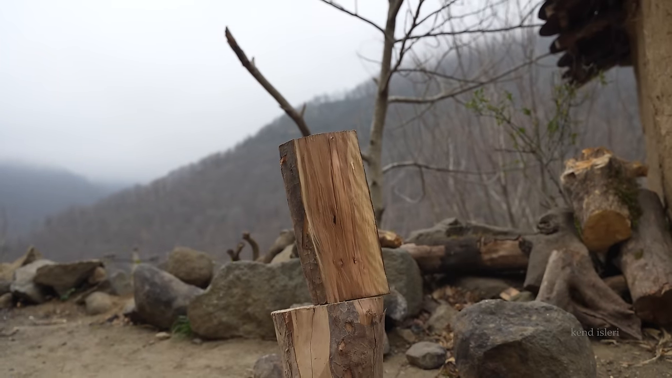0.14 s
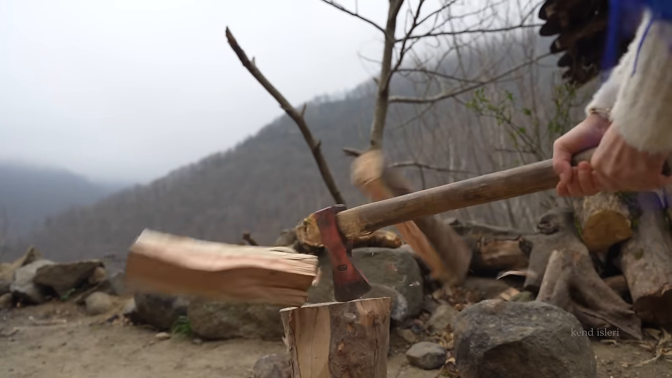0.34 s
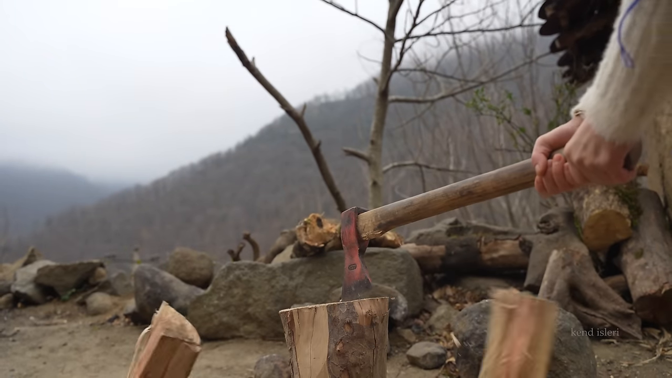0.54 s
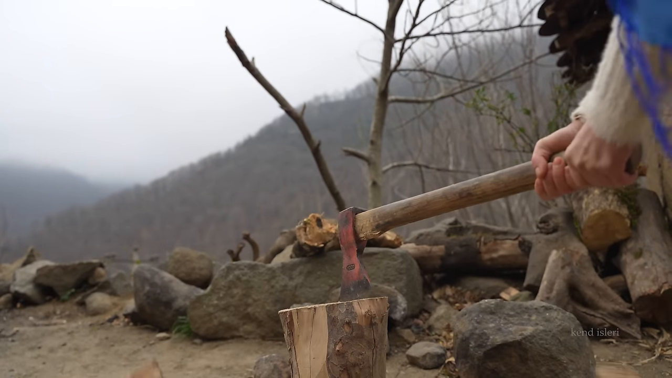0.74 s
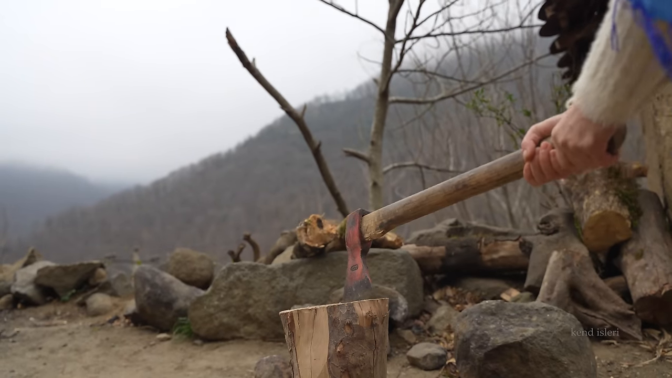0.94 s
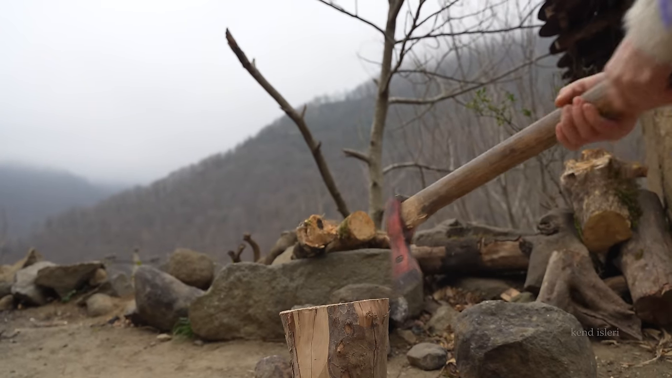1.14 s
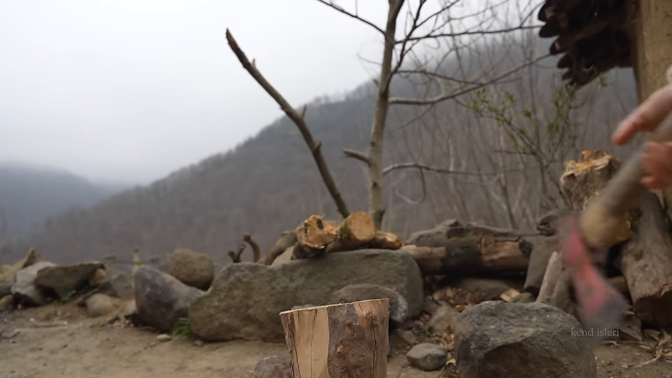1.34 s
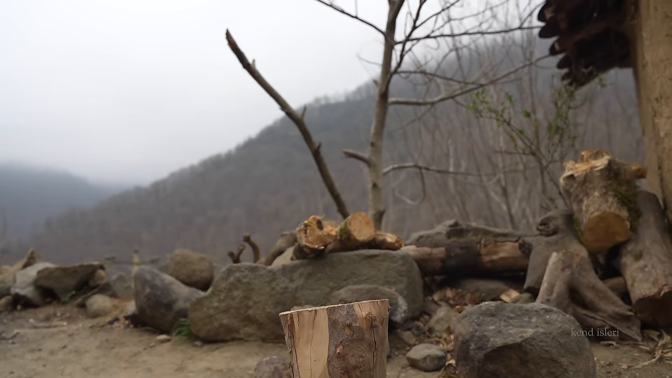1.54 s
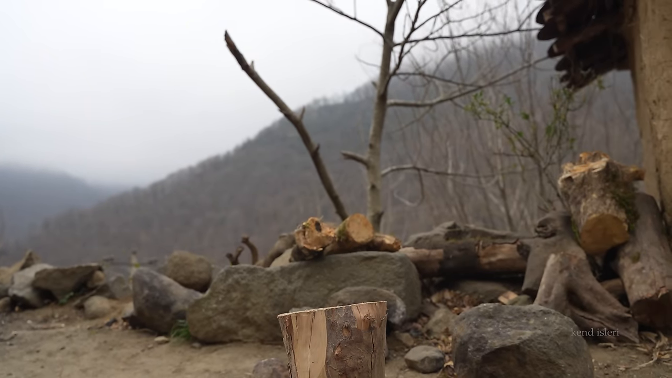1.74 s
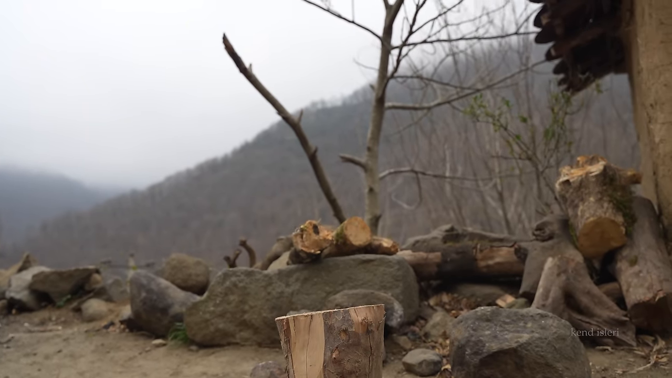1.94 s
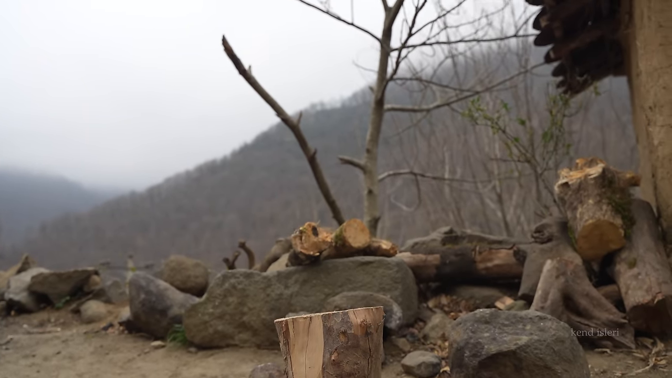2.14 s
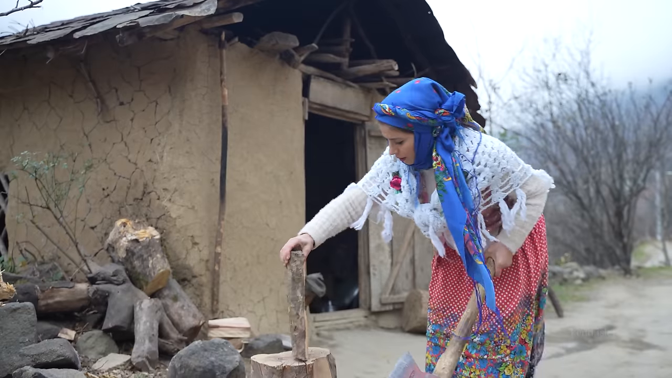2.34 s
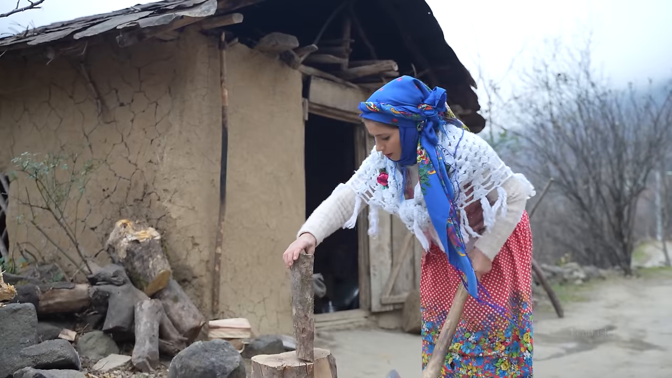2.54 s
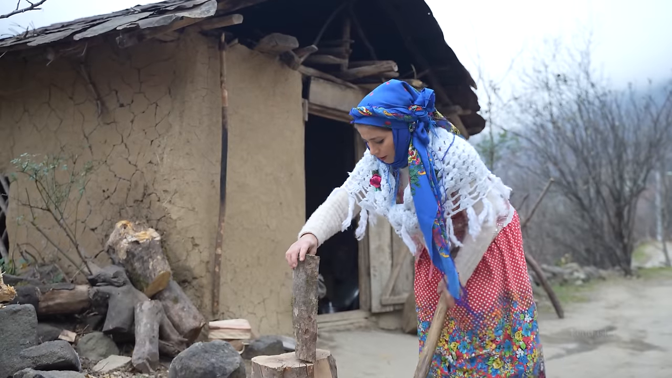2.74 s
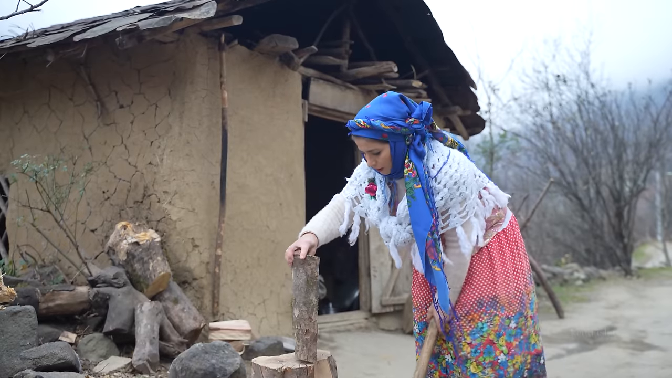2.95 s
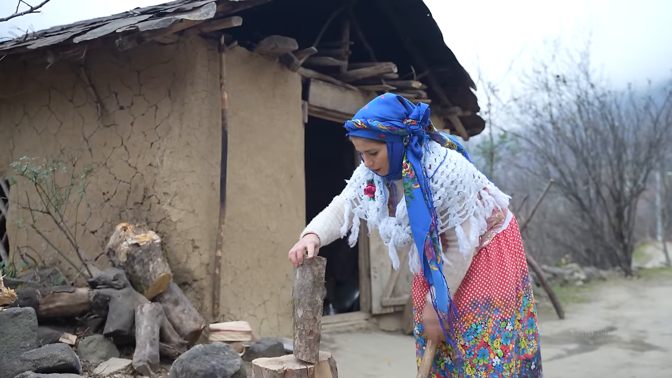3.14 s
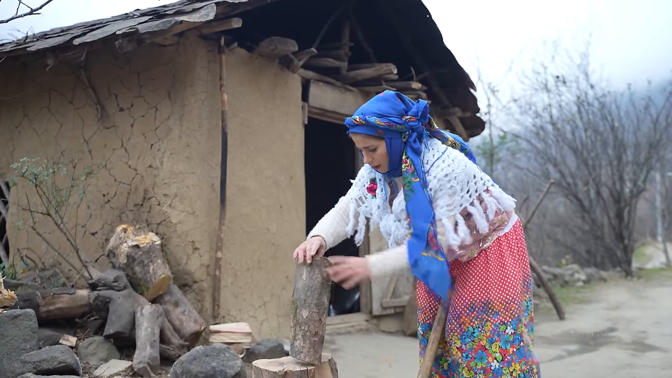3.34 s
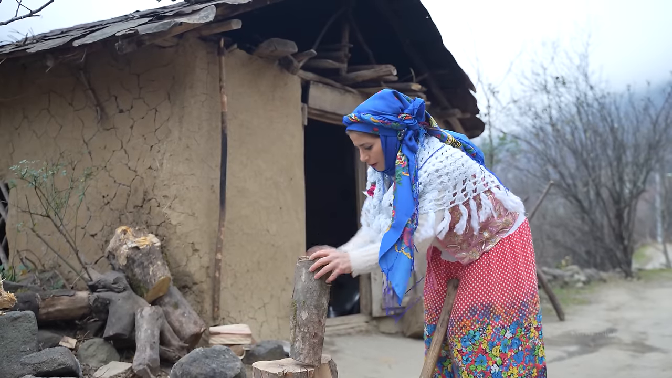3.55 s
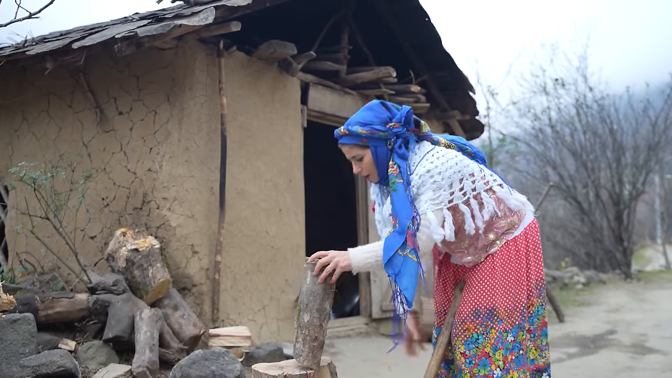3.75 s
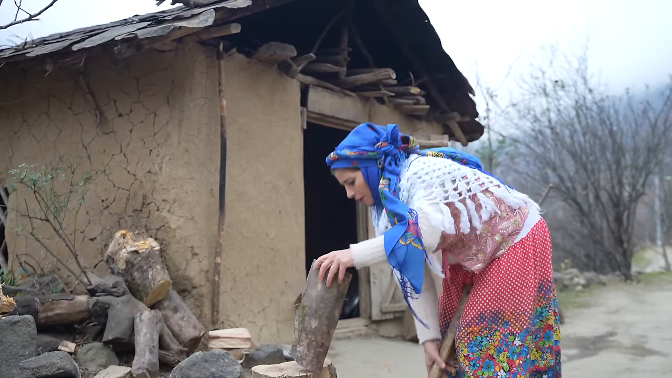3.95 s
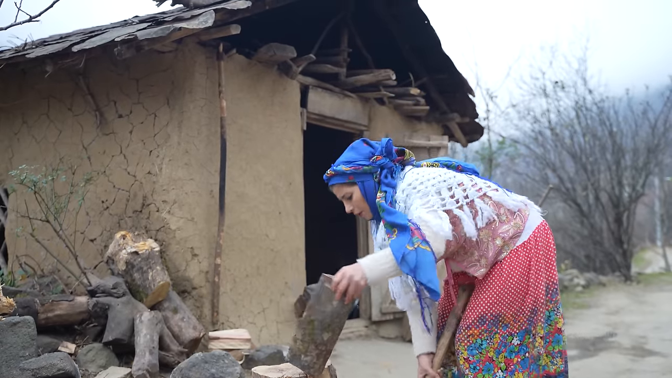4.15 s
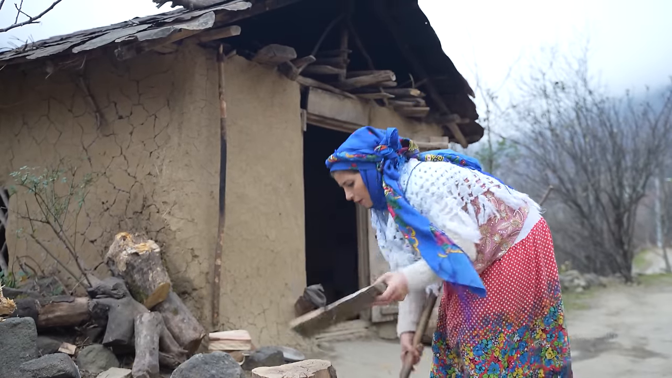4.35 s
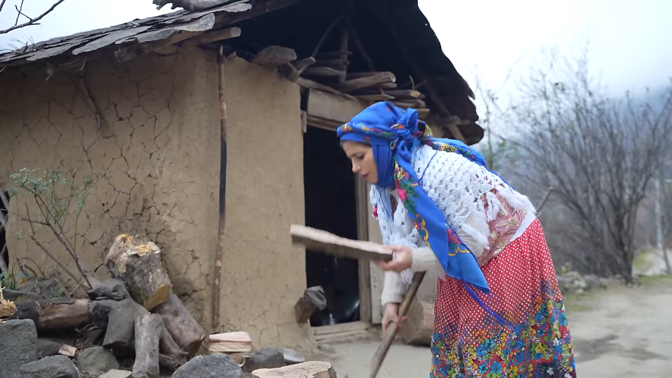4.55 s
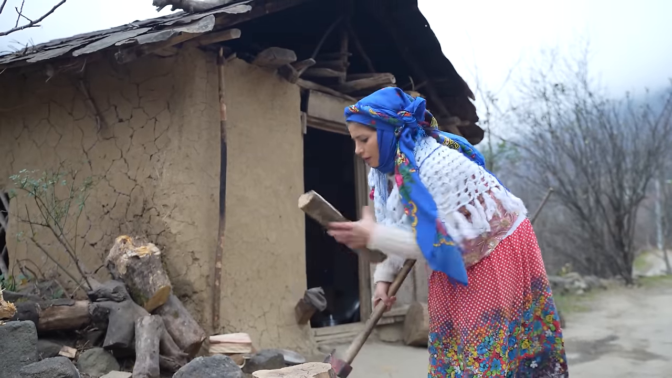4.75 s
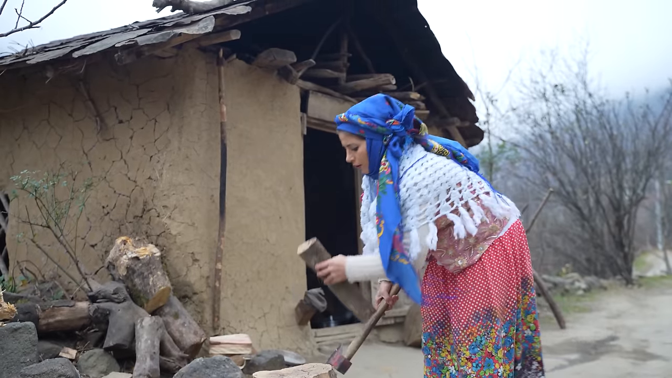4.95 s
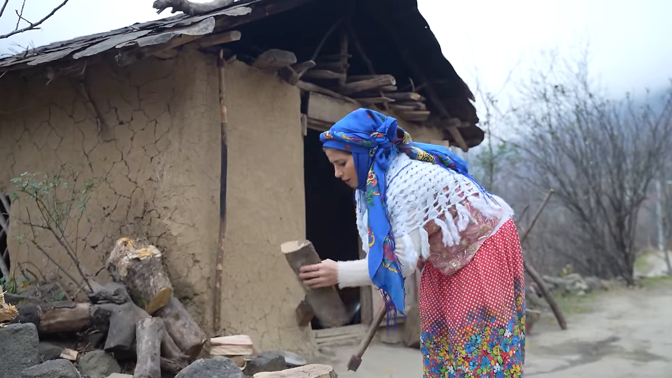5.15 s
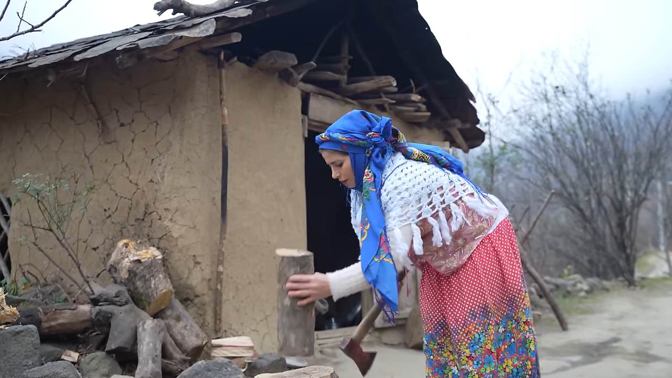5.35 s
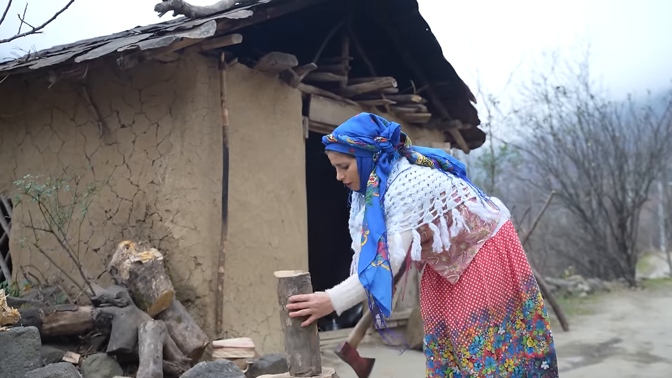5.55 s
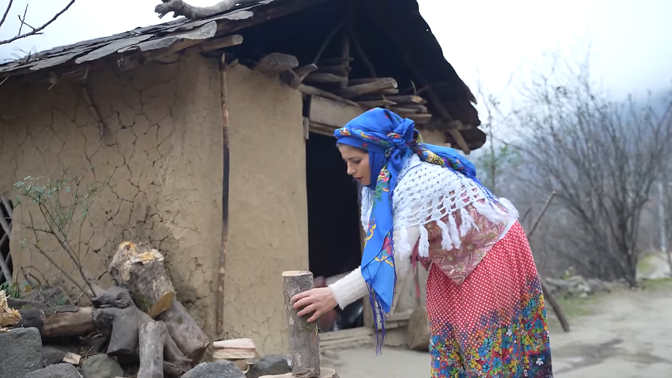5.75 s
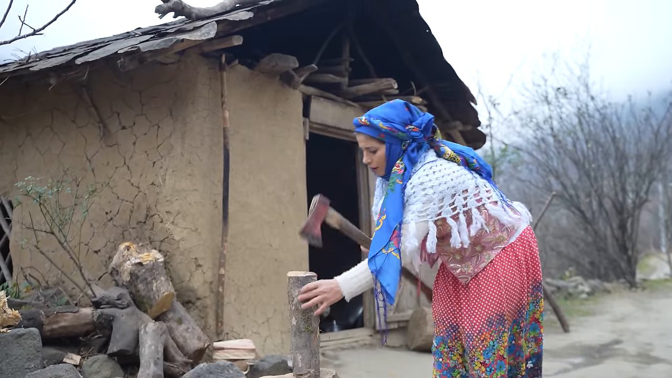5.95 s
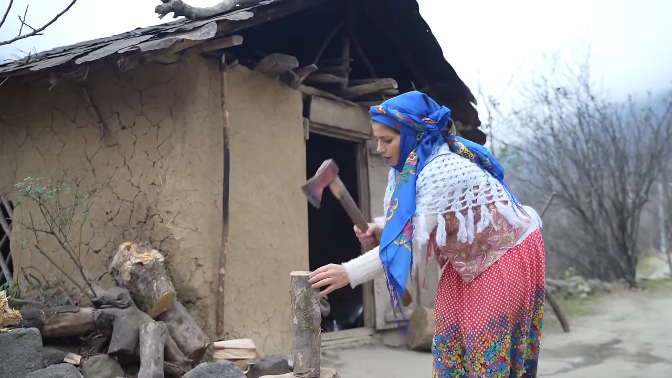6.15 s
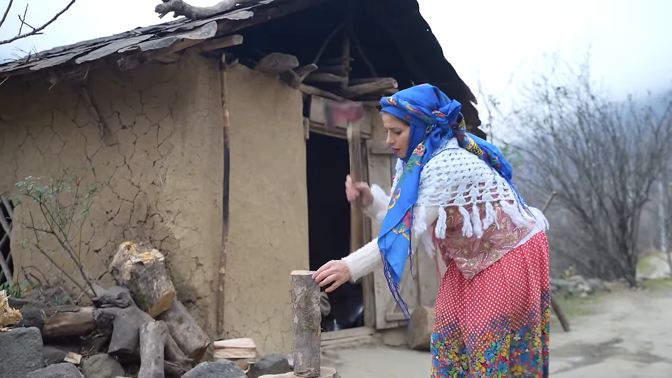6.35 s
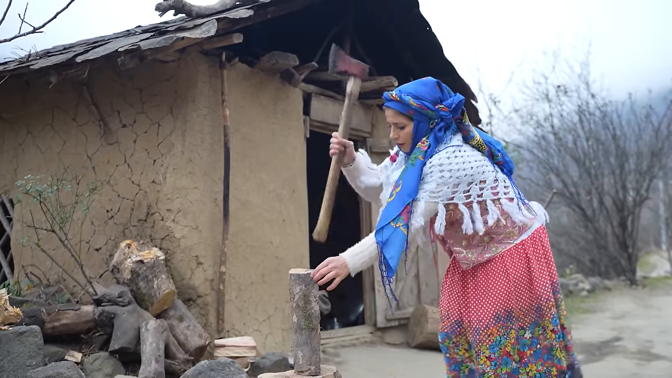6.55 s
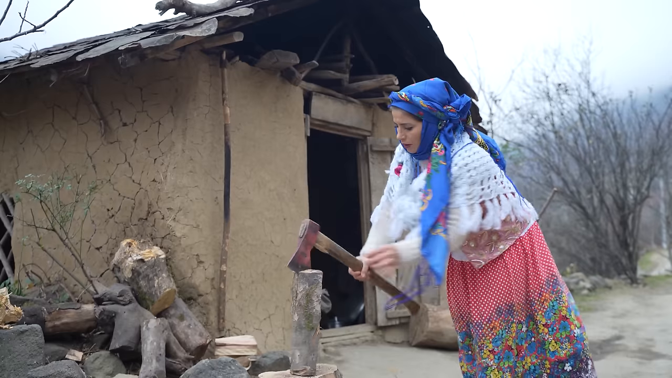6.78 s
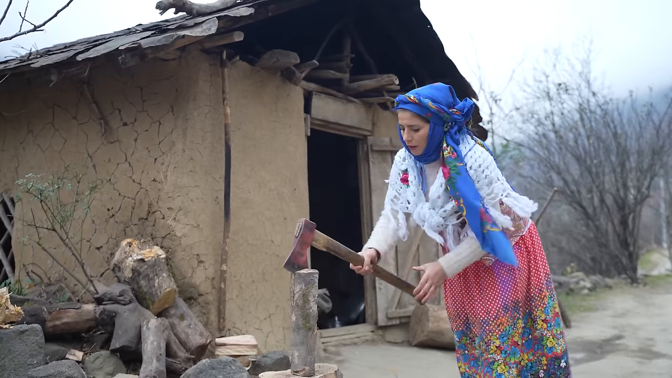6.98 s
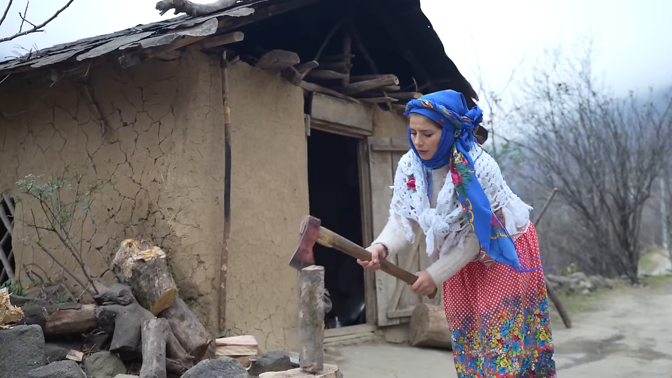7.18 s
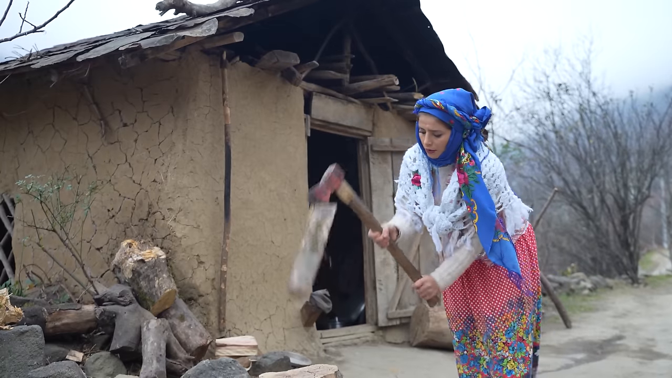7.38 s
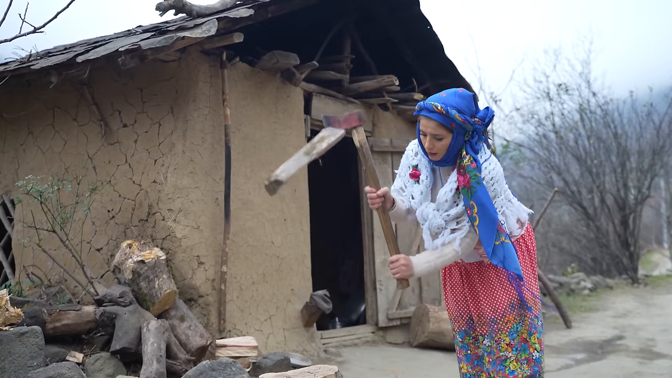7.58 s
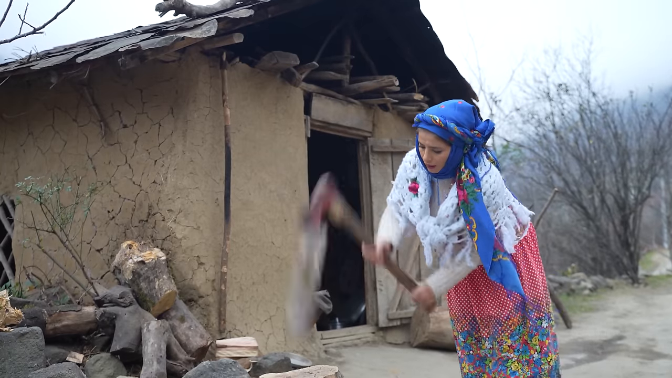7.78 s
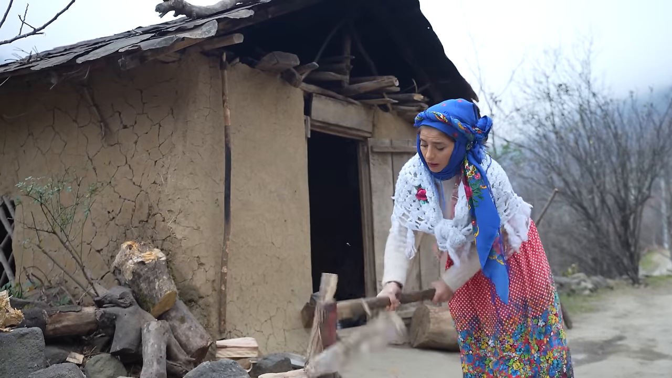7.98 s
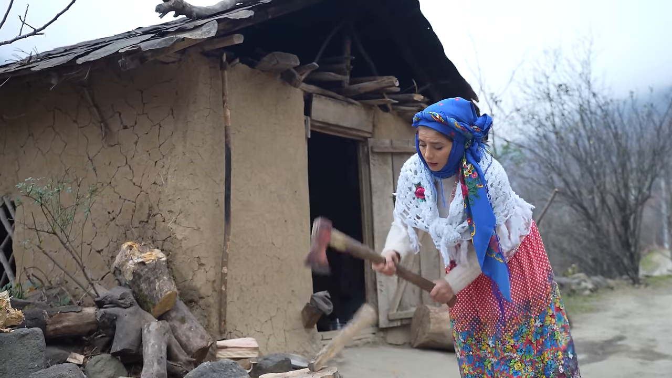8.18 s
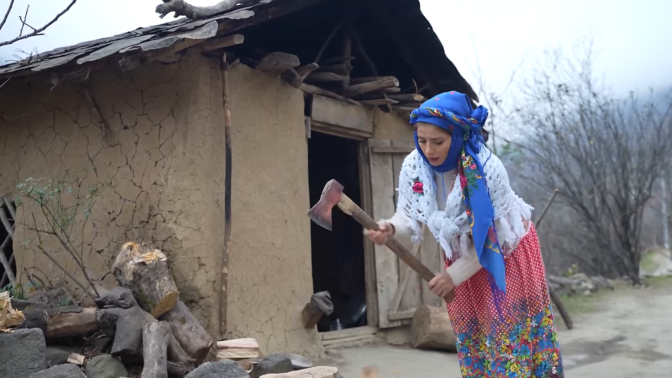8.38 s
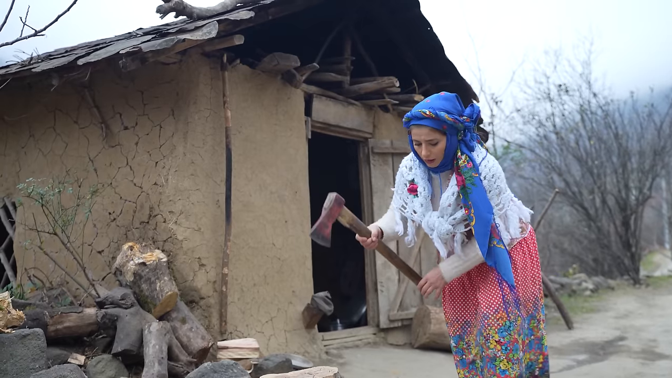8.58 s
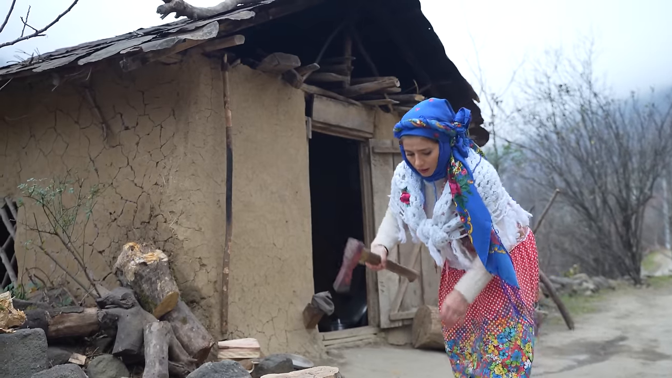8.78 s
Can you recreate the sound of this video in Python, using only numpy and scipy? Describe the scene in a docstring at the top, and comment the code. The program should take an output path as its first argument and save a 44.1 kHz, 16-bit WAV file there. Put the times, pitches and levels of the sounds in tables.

```python
"""An axe splits firewood on a block in a village yard: thuds, woody knocks and crackling noise bursts.
Struck wood rings like rough bars, made of fading sine waves; scattered echoes answer.
Between blows a log is dragged (noise through wood resonances) and the steel head chatters on stone.
Shaped noise makes wind, a few low thumps, clothes and footsteps; gliding tones make short thin calls,
perhaps a small bird, and a far rooster."""
import sys
import numpy as np
from scipy import signal
from scipy.fft import rfft, irfft
from scipy.io import wavfile
from scipy.ndimage import uniform_filter1d

SR = 44100
rng = np.random.default_rng(int(sys.argv[2]) if len(sys.argv) > 2 else 0)


def put_to_file(sound):
    """Save the sound as 16-bit audio at rate SR, in the file named by the first command-line argument."""
    columns = np.atleast_2d(sound).T  # one column per channel
    safe = np.clip(columns, -1, 1)
    whole_steps = np.round(safe * 32767)
    wavfile.write(sys.argv[1], SR, whole_steps.astype(np.int16))


N = 388962  # length of the scene in samples

# Levels are starting points: some sources shift them all by a fixed number of dB.
# t60_s is the time a sound takes to fade by 60 dB; pan_db is left over right.
# breeze rising and dropping: time_s, level_db
BREEZE = [(0, -39.5), (.6, -67), (1.13, -44.5), (1.28, -67), (1.65, -59.5), (1.8, -42), (2.25, -70),
          (2.9, -49), (3.8, -48.5), (4.95, -56), (5.25, -45.5), (5.9, -54.5), (7.4, -54.5), (7.65, -58),
          (8.4, -69), (8.82, -63)]
# gusts and a few low thumps: peak_s, length_s, level_db
GUSTS_AND_THUMPS = [(.46, 0.52, -45), (.66, 0.29, -45), (1.88, 0.21, -42), (2.08, 0.41, -38.5),
                    (2.26, 0.21, -33.5), (2.52, 0.3, -42), (2.68, 0.19, -38.5), (2.85, 0.055, -43),
                    (3.09, 1, -58.5), (4.025, 0.069, -43), (5.37, 0.16, -48.5), (6.31, 0.12, -43),
                    (6.88, 0.35, -50.5), (7.88, 0.15, -47)]
# tone of the deep wind rumble: pitch_hz, level_db
RUMBLE_TONE = [(10, -11), (22, -6), (40, -5.5), (80, -2), (130, -9), (200, -21), (400, -31.5), (1000, -105)]
# tone of the buffeting, gusts and thumps: pitch_hz, level_db
BUFFET_TONE = [(60, -22), (120, 1), (220, 4), (350, -7.5), (600, -11.5), (1200, -28.5), (3000, -39)]
# tone of the steady hush of the valley: pitch_hz, level_db
HUSH_TONE = [(30, 7.5), (100, -14), (390, -21), (750, -11), (1500, -14.5), (2500, -17), (5600, -22),
             (9000, -26), (16000, -26)]
HUSH_DB = -58
# buffeting is BUFFET_DB when the breeze is at BUFFET_BREEZE_DB, and grows by this many dB per dB of breeze
BUFFET_BREEZE_DB, BUFFET_GROWTH, BUFFET_DB = -50, 0.58, -67.5
SURGE_RISE, SURGE_RUMBLE_DB = 0.35, -0.5  # share of a gust or thump spent building up; rumble added to it

# how alike left and right noise are: pitch_hz, correlation (no unit)
LIKENESS = [(60, 0.89), (400, 0.35), (1200, 0.5), (3000, 0.098), (14000, 0.052)]
# fading time of the long yard echo: pitch_hz, t60_s
YARD_T60 = [(150, 1), (500, 0.76), (2000, 1), (5000, 0.92), (10000, 0.66), (16000, 0.42)]
# tone of the yard echo: pitch_hz, level_db
YARD_TONE = [(100, -1), (400, 12), (1200, 5), (2400, 2.5), (6000, 3.5), (16000, 4.5)]
EDGE_HZ = 16100  # top of the recorder's range

# pitch of the crow: time_s, pitch_hz
CROW_PITCH = [(6.66, 495), (6.71, 436), (6.775, 466), (6.83, 513), (6.91, 473.4), (7.22, 475.4),
              (7.27, 491.5), (7.35, 466.6), (7.426, 544), (7.495, 487), (7.59, 573), (7.605, 720),
              (7.68, 770), (7.8, 703)]
# syllables of the crow: start_s, length_s, level_db, fundamental_db (against the octave)
CROW_NOTES = [(6.66, 0.085, -49.5, -14), (6.755, 0.85, -51, -17), (7.6, 0.19, -65, 3)]
CROW_ATTACK_S, CROW_RELEASE_S, CROW_SWELL_DB_PER_S = 0.021, 0.087, 6
# gliding partials of short thin calls, perhaps a small bird; several rows may sound together:
# start_s, length_s, start_pitch_hz, end_pitch_hz, level_db
CALL_PARTIALS = [(5.22, 0.13, 2730, 2650, -61), (5.322, 0.03, 2450, 2950, -51),
                 (5.335, 0.03, 2800, 3600, -56), (5.31, 0.09, 4030, 4170, -56),
                 (6.264, 0.04, 4900, 6700, -55), (6.28, 0.04, 6600, 6570, -58),
                 (6.422, 0.05, 4700, 6600, -54)]
CALL_FLUTTER = .022  # typical pitch wobble, as a share of the pitch
OCTAVE_DB, OCTAVE_FALL_DB_PER_KHZ = 19, 9  # the octave weakens as the pitch climbs

# sleeve or skirt sweeping past: peak_s, length_s, level_db
SWEEPS = [(.23, 0.27, -51.5), (.9, 0.089, -49.5), (1.26, 0.22, -46), (1.41, 0.2, -43.5), (1.82, 0.26, -48),
          (1.95, 0.35, -44.5), (2.97, 0.25, -54.5), (3.49, 0.041, -52.5), (4.2, 0.57, -58.5),
          (4.88, 0.061, -46.5), (5.34, 0.19, -57.5), (5.57, 0.1, -46), (7.35, 0.19, -49)]
# tone of brushing cloth: pitch_hz, level_db
CLOTH_TONE = [(200, -6.5), (900, -13.5), (3000, -1), (5000, -1), (10000, 2.5), (15500, -2)]
SWEEP_RISE, RUSTLE_DB, RUSTLE_SWAY_DB = 0.64, -65, 4  # share spent speeding up; clothes between sweeps
CLOTH_FOLD_DB, CLOTH_FOLDS_PER_S = 1.5, 25
# soles and bark crunching on grit: peak_s, length_s, level_db
SCUFFS = [(3.228, 0.1, -48), (5.445, 0.062, -50.5), (5.498, 0.064, -48), (5.57, 0.14, -42.5),
          (5.665, 0.17, -49.5), (5.74, 0.13, -49), (7.21, .06, -51), (7.3, 0.093, -45.5),
          (7.345, 0.081, -41)]
# tone of the crunch: pitch_hz, level_db
CRUNCH_TONE = [(300, -5), (800, 1.5), (2400, 3), (3300, 2), (5500, -4.5), (16000, -8)]
# small grit ticks underfoot: start_s, level_db
TICKS = [(2.17, -51.5), (2.308, -50), (2.867, -56), (2.928, -52), (5.94, -53), (6.47, -53.5)]
# log twisted and dragged on the block: peak_s, length_s, level_db
DRAGS = [(2.55, 0.086, -49.5), (2.63, 0.12, -42), (2.738, 0.072, -41), (2.78, 0.22, -42),
         (2.832, 0.029, -41), (3.06, 0.098, -41)]
# tone of the grinding grit: pitch_hz, level_db
GRIT_TONE = [(100, -13), (300, -9), (550, -1), (930, -1.5), (1400, -3), (2200, 1), (3800, -2), (7000, -8),
             (16000, -18)]
# wood resonances woken by dragging: pitch_hz, width_hz, level_db
DRAG_MODES = [(915, 42, 19), (990, 40, 15), (1240, 110, 11), (1305, 55, 17), (1510, 90, 11), (1760, 70, 10),
              (3940, 20, 16), (5010, 30, 8)]
DRAG_RISE = 0.38  # share of a drag before the grit gives way; scuffs use it too
DRAG_SHIFT_DB, DRAG_SHIFTS_PER_S, SLIP_DB, SLIPS_PER_S = 3, 20, 3, 110

# axe head knocked or chattering over stone: start_s, level_db, treble_db
CLINKS = [(.456, -36, -7), (0.512, -35, 2), (3.0315, -22, -5.5), (3.073, -30, -9), (3.571, -46, 6),
          (3.5992, -31.5, 2), (3.621, -38.5, 8), (3.6352, -29.5, -2.5), (3.6647, -26.5, 4.5),
          (3.7045, -34.5, 1), (3.7511, -38, 5), (3.774, -39, -2), (3.8183, -28.5, 5), (3.847, -38.5, -2),
          (3.8837, -26, 1), (3.9174, -27, -1.5), (3.961, -28.5, -7.5), (4.0008, -25.5, -2.5),
          (4.03, -32, -25), (4.1011, -38.5, -4), (4.2803, -40, -8), (4.308, -39, -5)]
# ringing tones of the axe head: pitch_hz, level_db, t60_s
STEEL_MODES = [(887, -3, 0.055), (1500, -5.5, 0.07), (2245, 4, 0.042), (2895, 0, 0.045), (3130, -5, 0.04),
               (5422, 1.5, 0.05), (5805, 3.5, 0.03), (7012, -10, 0.06), (8790, -19, 0.1), (9350, -7, 0.02),
               (9648, -5.5, 0.05), (10400, 0, 0.1), (13325, -13, 0.088)]
STEEL_TREBLE_HZ, SKIDS_PER_S = 4000, 300  # treble_db acts above this; tiny bounces within a skip
STEEL_VARY_DB, SCRATCH_DB, SCRATCH_T60 = 2.8, -4, .06

# ringing tones of struck wood, of a log bumping the block, and a bright grit click:
# start_s, level_db, base_pitch_hz, t60_s
RINGS = [(0.324, -18, 1750, .04), (0.336, -20, 505, .06), (0.474, -28, 1210, .08), (0.513, -27, 1200, .06),
         (0.640, -39, 1642, .11), (0.7135, -18, 7900, .006), (0.847, -27, 1637, .12),
         (0.968, -30, 1895, .08), (1.03, -31, 2980, .03), (1.032, -31, 1800, .04), (1.05, -32, 1640, .08),
         (1.069, -31, 1380, .03), (1.104, -34, 1640, .07), (1.112, -37, 1170, .06),
         (1.158, -34, 1900, .025), (3.033, -29, 797, .045), (3.073, -29, 780, .035), (3.075, -25, 255, .09),
         (3.394, -35, 230, .06), (4.66, -54, 1172, .12), (4.86, -53, 1172, .1), (5.546, -17, 1172, .12),
         (6.87, -31, 1720, .05), (6.871, -30, 2670, .05), (7.903, -13, 1210, .03), (7.904, -18, 2250, .035),
         (7.993, -15, 650, .025), (7.994, -15, 1450, .025), (8.027, -23, 2200, .05), (8.087, -25, 2300, .1),
         (8.476, -31, 904, .13), (8.628, -36, 915, .12), (8.689, -20, 720, .04), (8.695, -17, 1125, .075)]
# tones within each ring: multiple of base pitch (no unit), level_db
RING_MODES = [(0.998, -1), (1.68, -19), (2.31, -15.5), (3.16, -30)]
# wedged blade creaking as the log is lifted: start_s, length_s, pitch_hz, level_db
CREAKS = [(7.2, .025, 2750, -53), (7.226, .02, 2720, -53), (7.29, .02, 3200, -49)]
CREAK_WIDTH_HZ = 200
# fibres and splinters snapping: start_s, level_db
SNAPS = [(.2948, -33), (.3312, -35), (.3351, -28), (.3748, -34), (.7572, -44), (7.9025, -29), (7.9362, -35),
         (7.9543, -37), (7.9666, -31), (7.9928, -33), (8.0287, -37)]
SNAP_T60 = .005  # seconds

# low tones of wood on earth, before small pitch changes: pitch_hz, level_db, t60_s
THUD_MODES = [(213, -13.5, 0.023), (288.3, 1, 0.027), (348.5, 4.5, 0.019), (434, -9.5, 0.041)]
# tone of the woody knock: pitch_hz, level_db
KNOCK_TONE = [(200, -22), (450, -13.5), (720, 3.5), (1000, -5), (1400, 1), (2400, -2.5), (2900, -4),
              (4500, -16.5), (10000, -29)]
# tone of the sharp crack: pitch_hz, level_db
CRACK_TONE = [(1000, -55), (2400, -1), (3500, 2), (5800, 2), (8000, 2), (11000, -1.5), (16000, -7)]
# wood and chips landing: start_s, thud_db, knock_db, crack_db, crack_t60_s, pan_db
LANDINGS = [(0.424, -37.5, -39, -64, 0.022, 8), (0.541, -70, -61, -26, 0.032, -5.5),
            (0.571, -27.5, -36, -32.5, 0.0078, -1), (0.639, -24.5, -35.5, -31.5, 0.0098, -5.5),
            (0.665, -38, -86, -46.5, 0.017, -6), (0.7127, -43, -52, -36, 0.0058, -3),
            (0.757, -52, -102, -40, 0.096, -10), (0.846, -31.5, -39.5, -26.5, 0.04, -7),
            (0.958, -38, -42, -28.5, 0.047, -9), (0.967, -23.5, -33, -31, 0.013, -3),
            (1.03, -34, -47, -30.5, 0.11, -9), (1.049, -35, -53, -41, 0.061, -4),
            (1.069, -41, -47.5, -41.5, 0.15, -7), (1.103, -38.5, -57, -55, 0.13, 3),
            (1.115, -54, -61, -46, 0.045, 4), (1.125, -45, -71, -33.5, 0.11, -9),
            (1.156, -41, -70, -44.5, 0.061, -7), (2.412, -35, -69, -85, 0.025, 19),
            (3.073, -69, -55, -40, 0.096, 0), (5.5455, -80, -42.5, -23, 0.014, -0.5),
            (7.9925, -40, -32.5, -50, 0.017, 1), (8.026, -51, -35, -31, 0.3, -3),
            (8.0855, -73, -35.5, -24, 0.1, -3), (8.158, -78, -39.5, -55, 0.067, -8),
            (8.2425, -31.5, -39, -30, 0.14, -4.5), (8.329, -58, -50, -37.5, 0.54, -6.5),
            (8.475, -30.5, -38, -48, 0.034, -5.5), (8.626, -40.5, -47, -64, 0.61, -6),
            (8.6885, -27.5, -29.5, -39, 0.021, -9), (8.7335, -35, -43, -33, 0.057, -8),
            (8.758, -33, -43.5, -43, 0.048, -3), (8.809, -45, -56, -71, 0.041, -5)]
# log tearing open in jerks: start_s, thud_db, knock_db, crack_db, crack_t60_s, pan_db
SPLITS = [(0.309, -67, -30, -43, 0.17, -9), (0.3235, -60, -28.5, -31, 0.028, -1),
          (0.3305, -48, -44, -29.5, 0.02, -11), (0.3348, -48, -33, -44, 0.016, -2),
          (0.361, -48, -35, -32, 0.067, -3), (0.374, -48, -59, -34.5, 0.018, 9),
          (6.869, -45.5, -44.5, -36.5, 0.055, -3), (7.919, -71, -29, -27.5, 0.2, -4),
          (7.935, -60, -28.5, -32, 0.21, 16), (7.951, -56, -26.5, -32, 0.07, -10),
          (7.965, -60, -32.5, -25.5, 0.047, -3)]
# blade entering the wood: start_s, thud_db, knock_db, crack_db, crack_t60_s, pan_db
CHOPS = [(0.2888, -64, -38, -30, 0.039, -5), (0.2942, -67, -34.5, -54, 0.019, 2),
         (6.8235, -40, -40, -34.5, 0.012, -3), (7.902, -44, -28.5, -38, 0.025, -5.5)]
# resonances of the thick first log: pitch_hz, width_hz, level_db
THICK_LOG = [(500, 34, 7.5), (1200, 140, 3.5), (1660, 46, -20), (1970, 150, -4), (2720, 620, -4),
             (3330, 62, 5), (5740, 380, 1)]
# resonances of the slim second log: pitch_hz, width_hz, level_db
SLIM_LOG = [(1150, 80, 0), (1430, 35, -2), (1780, 35, -4), (2300, 170, 0), (2560, 30, -8), (3400, 130, -3)]
SECOND_LOG_S, SECOND_LOG_THUD = 4.4, 0.912  # when the longer second log takes over; its thud pitch ratio


def amp(db):
    """Turns decibels into a gain."""
    return 10 ** (np.asarray(db) / 20)


def unit(x):
    """Scales a signal to an average strength (rms) of 1."""
    return x / np.sqrt(np.mean(x ** 2) + 1e-20)


def read(points, hz):
    """Reads a table between its points, with pitch spaced as the ear hears it (log scale)."""
    f, value = np.transpose(points)
    return np.interp(np.log(hz + 1), np.log(f + 1), value)


def level(rows):
    """Turns a curve of time and dB into a gain over the whole scene."""
    return amp(np.interp(np.arange(N) / SR, *np.transpose(rows)))


def swells(rows, rise):
    """Gain of smooth strokes: each builds for the share rise of its length, then dies away."""
    t, power = np.arange(N) / SR, np.zeros(N)
    for s, length, db in rows:
        away = (t - s) / (length * np.where(t < s, rise, 1 - rise))
        power += (amp(db) * np.exp(-2 * away ** 2)) ** 2
    return np.sqrt(power)


def sides(pan_db):
    """Left and right gains that keep the total power the same."""
    return unit(amp([[pan_db / 2], [-pan_db / 2]]))


def add(mix, s, sound):
    """Mixes a stereo sound in at time s."""
    part = mix[:, max(round(s * SR), 0):][:, :sound.shape[1]]
    part += sound[:, :part.shape[1]]


def noise(tone, size):
    """Stereo noise with a given tone; left and right are most alike in the bass."""
    hz = np.fft.rfftfreq(size, 1 / SR)
    a, b = rfft(rng.standard_normal((2, size)))
    same = np.clip(read(LIKENESS, hz), -1, 1)
    right = same * a + np.sqrt(1 - same ** 2) * b
    return unit(irfft(np.array([a, right]) * amp(read(tone, hz)), size))


def wander(rate):
    """Smooth random movement of rms 1, mostly slower than rate times a second."""
    spectrum = rfft(rng.standard_normal(N))
    return unit(irfft(spectrum * np.exp(-(np.fft.rfftfreq(N, 1 / SR) / rate) ** 2), N))


def patter(per_s, size):
    """Sparse clicks of random strength."""
    return rng.standard_normal(size) * (rng.random(size) < per_s / SR)


def ring(modes, t, spread):
    """Adds fading sine waves, each with its own random phase at the two microphones."""
    out = 0
    for hz, db, t60 in modes:
        phase = spread * rng.standard_normal((2, 1))
        out = out + amp(db - 60 * t / t60) * np.sin(2 * np.pi * hz * t + phase)
    return out


def resonate(x, modes):
    """Adds up narrow resonances that are all shaken by the signal x."""
    return sum(amp(db) * signal.lfilter(*signal.iirpeak(hz, hz / width, SR), x) for hz, width, db in modes)


def blow(x, db):
    """Gives each side of a short sound the energy of 25 ms at the level db."""
    return amp(db) * x / np.sqrt(np.mean(x ** 2, 1, keepdims=True) * x.shape[1] / (.025 * SR) + 1e-20)


def wind_and_thumps():
    """Lumpy low noise follows the breeze, its gusts and a few thumps, over the steady hush of the valley."""
    breeze, surges = level(BREEZE), swells(GUSTS_AND_THUMPS, SURGE_RISE)
    rumble_gain = np.hypot(breeze, amp(SURGE_RUMBLE_DB) * surges)
    rumble = rumble_gain * unit(noise(RUMBLE_TONE, N) * amp(4.5 * wander(23)))
    eddies = amp(BUFFET_DB) * (breeze / amp(BUFFET_BREEZE_DB)) ** BUFFET_GROWTH
    buffet = np.hypot(eddies, surges) * unit(noise(BUFFET_TONE, N) * amp(4.35 * wander(55)))
    return rumble + buffet + amp(HUSH_DB) * noise(HUSH_TONE, N)


def yard(x, delay_s=.017, early_db=5, early_t60=0.26):
    """Scattered echoes: a short part from wall and woodpile, a longer one from trees and slope."""
    taps = patter(5000, (2, SR))
    hz, t, z = signal.stft(taps, SR, nperseg=256)
    decay = amp(-60 * t / read(YARD_T60, hz)[:, None]) + amp(early_db - 60 * t / early_t60)
    tail = signal.istft(z * decay * amp(read(YARD_TONE, hz))[:, None], SR, nperseg=256)[1]
    tail = tail / np.linalg.norm(tail, axis=1, keepdims=True)
    tail = np.pad(tail, ((0, 0), (int(delay_s * SR), 0)))
    return signal.fftconvolve(x, tail, axes=1)[:, :N]


def rooster(jitter=0.007, shimmer_db=1.5):
    """A short syllable, a long nearly pure note that swells, then a faint ending in a higher register."""
    t = np.arange(N) / SR
    pitch = np.interp(t, *np.transpose(CROW_PITCH)) * (1 + jitter * wander(82))
    phase, out = 2 * np.pi * np.cumsum(pitch) / SR, np.zeros(N)
    for s, length, db, fundamental_db in CROW_NOTES:
        attack = np.clip((t - s) / CROW_ATTACK_S, 0, 1)
        release = np.clip((s + length - t) / CROW_RELEASE_S, 0, 1) ** 2
        voice = unit(amp(fundamental_db) * np.sin(phase) + np.sin(2 * phase))
        out += attack * release * voice * amp(db + CROW_SWELL_DB_PER_S * np.clip(t - s, 0, length))
    return out * amp(shimmer_db * wander(25)) * sides(-13.0)


def thin_calls(direct_db=-3, scatter_db=-1, scatter_t60=0.35):
    """Gliding partials, each with an octave above, form short calls smeared by branches on their way."""
    out = np.zeros((2, N))
    for s, length, start_hz, end_hz, db in CALL_PARTIALS:
        hz = np.linspace(start_hz, end_hz, int(length * SR))
        phase = 2 * np.pi * np.cumsum(hz * (1 + CALL_FLUTTER * wander(540)[:len(hz)])) / SR
        octave = amp(OCTAVE_DB - OCTAVE_FALL_DB_PER_KHZ * hz / 1000)
        partial = np.hanning(len(hz)) * (np.sin(phase) + octave * np.sin(2 * phase))
        add(out, s, amp(db) * sides(-1.8) * partial)
    t = np.arange(SR // 2) / SR
    branches = rng.standard_normal((2, len(t))) * amp(-60 * t / scatter_t60)
    scattered = signal.fftconvolve(out, branches / np.linalg.norm(branches[0]), axes=1)[:, :N]
    return amp(direct_db) * out + amp(scatter_db) * scattered


def clothes():
    """Cloth brushes softly: noise that flickers with the weave and folds, louder in each sweep."""
    motion = np.hypot(swells(SWEEPS, SWEEP_RISE), amp(RUSTLE_DB + RUSTLE_SWAY_DB * wander(5.4)))
    flicker_db = 1.74 * wander(230) + CLOTH_FOLD_DB * wander(CLOTH_FOLDS_PER_S)
    return amp(1.5) * motion * unit(noise(CLOTH_TONE, N) * amp(flicker_db)) * sides(-7.5)


def footsteps():
    """Soles crunch on grit as quickly flickering noise, and single grains tick."""
    crunch = swells(SCUFFS, DRAG_RISE) * unit(noise(CRUNCH_TONE, N) * amp(2.1 * wander(340)))
    ticks, t = np.zeros((2, N)), np.arange(SR // 20) / SR
    for s, db in TICKS:
        add(ticks, s, blow(noise(CRACK_TONE, len(t)) * amp(-60 * t / 0.029), db))
    return crunch * sides(-4.5) + ticks


def dragged_log():
    """The log grinds on the block in small slips that shake its resonances."""
    slips = noise(GRIT_TONE, N) * amp(SLIP_DB * wander(SLIPS_PER_S))
    body = 0
    for mode in DRAG_MODES:
        # the contact point moves, so each resonance rises and falls on its own
        body = body + resonate(slips, [mode]) * amp(DRAG_SHIFT_DB * wander(DRAG_SHIFTS_PER_S))
    return amp(1.0) * swells(DRAGS, DRAG_RISE) * unit(slips + body) * sides(-4.5)


def axe_head(steel_db=-7.5, scratch_hz=200, tick_db=-5, tick_t60=0.0013, skid_db=-7, skid_t60=0.056):
    """Every skip over stone ticks, skids in tiny bounces and wakes the steel in a new mixture."""
    out, t = np.zeros((2, N)), np.arange(SR // 3) / SR
    for s, db, treble_db in CLINKS:
        modes = []
        for hz, mode_db, t60 in STEEL_MODES:
            mode_db += treble_db * (hz > STEEL_TREBLE_HZ) + STEEL_VARY_DB * rng.standard_normal()
            modes.append((hz, mode_db, t60))
        bounces = (t == 0) + patter(SKIDS_PER_S, len(t)) * amp(skid_db - 60 * t / skid_t60)
        bounces = bounces[None] / np.linalg.norm(bounces)
        steel = signal.fftconvolve(ring(modes, t, 1.42), bounces, axes=1)[:, :len(t)]
        bands = [(hz, scratch_hz, mode_db) for hz, mode_db, _ in modes]
        scratch = unit(resonate(rng.standard_normal((2, len(t))), bands))
        clink = steel + scratch * amp(SCRATCH_DB - 60 * t / SCRATCH_T60)
        clink = clink * (1 - np.exp(-t / 0.0014))  # soft start
        tick = noise(CRACK_TONE, len(t)) * amp(tick_db - 60 * t / tick_t60)
        add(out, s, amp(db + steel_db) * sides(-5.5) * (clink + tick))
    return out


def struck_rings():
    """Struck wood, log bumps and a bright grit click ring like rough bars; higher tones fade sooner."""
    out, t = np.zeros((2, N)), np.arange(SR // 3) / SR
    for s, db, hz, t60 in RINGS:
        modes = [(hz * k, mode_db, t60 / k ** .5) for k, mode_db in RING_MODES if hz * k < EDGE_HZ]
        add(out, s, amp(db) * sides(-2.1) * ring(modes, t, 0.55) * (1 - np.exp(-t / 0.00035)))
    return out


def creaks():
    """The blade slips in its cleft and wakes one narrow resonance of the wood."""
    out = np.zeros((2, N))
    for s, length, hz, db in CREAKS:
        slips = rng.standard_normal((2, int(length * SR)))
        creak = unit(resonate(slips, [(hz, CREAK_WIDTH_HZ, 0)]))
        add(out, s, amp(db) * creak * np.hanning(slips.shape[1]))
    return out


def snaps():
    """Single fibres part with a very short, dry crack."""
    out, t = np.zeros((2, N)), np.arange(SR // 20) / SR
    for s, db in SNAPS:
        crack = (noise(KNOCK_TONE, len(t)) + noise(CRACK_TONE, len(t))) * amp(-60 * t / SNAP_T60)
        add(out, s, sides(-9.5) * blow(crack, db))
    return out


def impacts(rows, thud_db, knock_db, crack_db, rise_s, knock_length, debris_db, debris_t60,
            grain_db, snap_db, snap_t60):
    """Each contact: a low thud, a knock of dense damped wood tones, a crackle of fibres, then crumbs."""
    out, t = np.zeros((2, N)), np.arange(SR // 4) / SR
    for s, thud, knock, crack, t60, pan in rows:
        attack = 1 - np.exp(-(t / rise_s) ** 2)
        snap = amp(snap_db - 60 * t / snap_t60)
        # random swings in level make the crackle grainy
        grains = amp(grain_db * unit(uniform_filter1d(rng.standard_normal(len(t)), size=40)))
        debris = grains * amp(debris_db - 60 * t / debris_t60)
        # every contact loads the wood differently, which shifts the thud's pitch
        pitch_ratio = np.exp(0.11 * rng.standard_normal())
        if s > SECOND_LOG_S:
            pitch_ratio *= SECOND_LOG_THUD
        modes = [(hz * pitch_ratio * rng.uniform(0.966, 1.077), db, d) for hz, db, d in THUD_MODES]
        low = ring(modes, t, 0.27) * (1 - np.exp(-(t / 0.0044) ** 2))
        body_fade = amp(-60 * t / (t60 * knock_length)) * np.sqrt(grains)
        body = noise(KNOCK_TONE, len(t)) * attack * (snap + body_fade + debris)
        top_fade = amp(-60 * t / t60) * np.sqrt(grains)
        top = noise(CRACK_TONE, len(t)) * attack * (snap + top_fade + debris)
        add(out, s, sides(pan / 3) * blow(low, thud + thud_db))  # the bass is panned less
        add(out, s, sides(pan) * (blow(body, knock + knock_db) + blow(top, crack + crack_db)))
    return out


def log_body(x, direct_db=-3, ring_db=-2):
    """The log under the blade colours every crack; a slimmer log takes over halfway through."""
    first = np.arange(N) / SR < SECOND_LOG_S
    ringing = resonate(x * first, THICK_LOG) + resonate(x * ~first, SLIM_LOG)
    return amp(direct_db) * x + amp(ring_db) * ringing


def landings():
    """Wood and chips hit block and ground with a thud, knock and crackle, straight from the contact."""
    return impacts(LANDINGS, thud_db=-2.0, knock_db=0.5, crack_db=-4.5, rise_s=0.00013,
                   knock_length=2.74, debris_db=-42, debris_t60=0.16,
                   grain_db=6.5, snap_db=1.5, snap_t60=0.034)


def splits():
    """The log tears open in jerks; its own resonances colour the noise of the fibres."""
    return log_body(impacts(SPLITS, thud_db=8.0, knock_db=2.0, crack_db=0.0, rise_s=0.0014,
                            knock_length=2.1, debris_db=-32, debris_t60=0.18,
                            grain_db=1.0, snap_db=-20, snap_t60=0.0081))


def chops():
    """The blade bites into the log, which rings along with the sudden blow."""
    return log_body(impacts(CHOPS, thud_db=-11.0, knock_db=3.5, crack_db=8.5, rise_s=0.00031,
                            knock_length=2.2, debris_db=-7, debris_t60=0.1,
                            grain_db=-3, snap_db=-31, snap_t60=0.0054))


def scene():
    """The hard blows fill the yard; what lands near the microphone stays almost dry."""
    background = wind_and_thumps() + clothes() + footsteps() + dragged_log()
    voices, steel, rings = rooster() + thin_calls(), axe_head(), struck_rings()
    landed, torn, chopped = landings(), splits(), chops()
    to_yard = amp(-2.5) * chopped + amp(-10.5) * torn + amp(-19.5) * landed
    to_yard += amp(-15.5) * rings + amp(-10.5) * steel + .18 * voices
    wood = chopped + torn + snaps() + creaks() + landed + rings
    return wood + steel + voices + yard(to_yard) + background


def record(dry):
    """The recorder cuts off everything above its top pitch."""
    lowpass = signal.firwin(255, EDGE_HZ, window=("kaiser", 9), fs=SR)
    return signal.oaconvolve(dry, lowpass[None], "same")


dry = scene()
out = record(dry)
put_to_file(out)
```